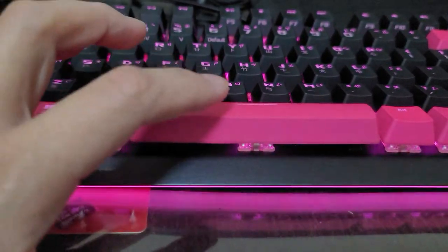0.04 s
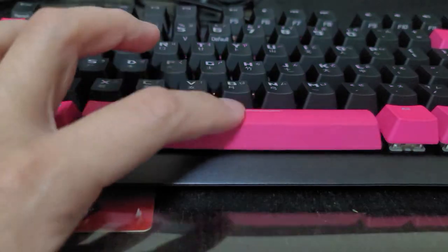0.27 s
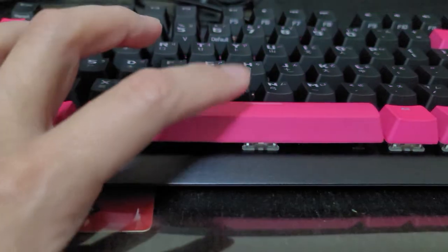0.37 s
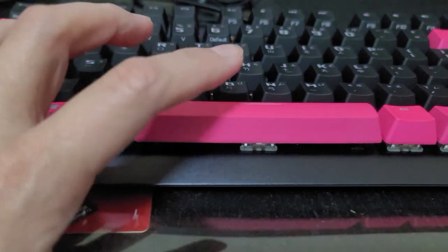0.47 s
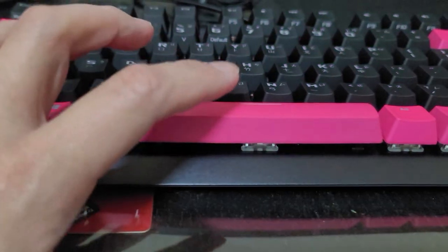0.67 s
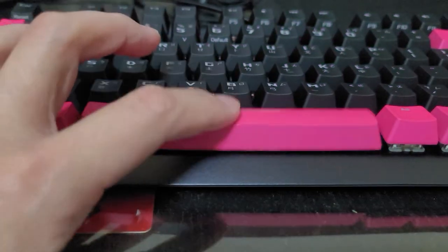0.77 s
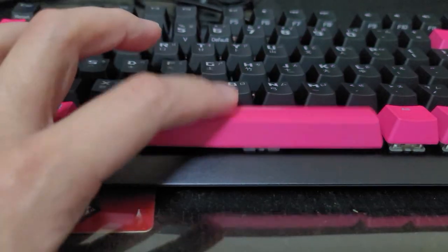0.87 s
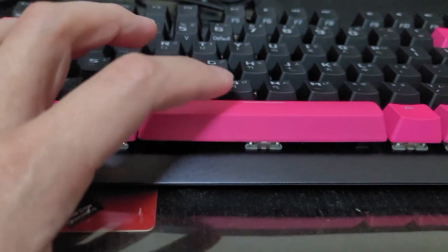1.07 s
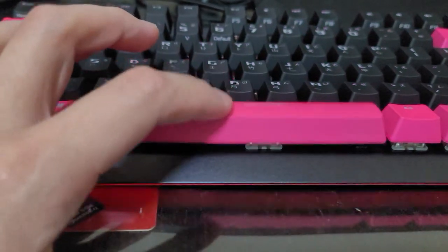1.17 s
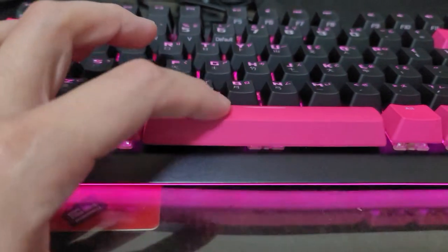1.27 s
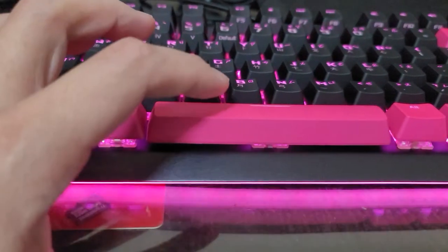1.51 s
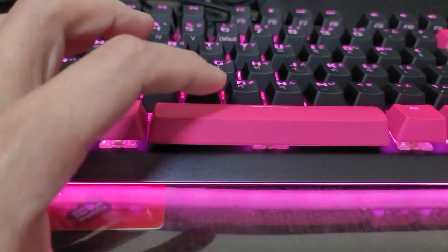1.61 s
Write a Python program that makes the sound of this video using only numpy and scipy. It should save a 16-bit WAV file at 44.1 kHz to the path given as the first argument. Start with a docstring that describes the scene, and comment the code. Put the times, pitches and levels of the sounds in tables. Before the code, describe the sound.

A mechanical keyboard's spacebar is tapped twice up close, followed by a softer click.

```python
"""A clicky mechanical keyboard on a desk in a small, quiet room, close to a pair of microphones.
Faint air noise and a fan's hum run throughout. A finger works the spacebar twice: the slider scrapes,
the switch snaps, the bar knocks as it bottoms out and thumps the desk; on release its wire ticks and the
bar clacks against its top stop, rattles and thumps again. Last, the switch scrapes and snaps once more,
with no knock, and the wire gives a faint tick. The room rings briefly after each contact."""
import sys
import numpy as np
from scipy import signal
from scipy.fft import rfft, irfft
from scipy.io import wavfile
from scipy.ndimage import uniform_filter1d

SR = 44100
rng = np.random.default_rng(int(sys.argv[2]) if len(sys.argv) > 2 else 0)


def output_pcm(signal):
    """Save a mono or channel-first signal as 16-bit PCM at the path in sys.argv[1].

    Samples are clipped to [-1, 1] before scaling.
    """
    pcm = np.clip(np.atleast_2d(signal).T, -1, 1) * 32767
    wavfile.write(sys.argv[1], SR, np.round(pcm).astype(np.int16))


N = 72765

# spectrum of the room's steady air noise: f/Hz, relative level/dB
AIR_SPECTRUM = [(20, -37), (35, -19), (58, -6), (100, -14.5), (140, -12), (175, -13), (240, -7.5),
                (290, -15.5), (390, -11.5), (550, -17), (900, -22.5), (1350, -21), (2400, -27.5),
                (4500, -42.5), (7000, -49), (9000, -61), (16000, -65.5)]
# how alike that noise is at the two microphones: f/Hz, correlation
AIR_CORRELATION = [(100, 0.91), (350, 0.92), (800, 0.24), (2000, 0.1), (8000, 0.088)]
# decay of the room: f/Hz, t60/s
ROOM_DECAY = [(200, 0.64), (1000, 0.17), (3000, 0.2352), (7000, 0.12), (15000, 0.27)]
# colour of its reflections: f/Hz, relative level/dB
ROOM_SPECTRUM = [(200, 10.5), (800, -5), (1800, -2), (3300, -1.5), (6000, 1), (10000, -1), (15000, -15)]

# the slider rubs the leaf spring: t/s, level/dB
SLIDER_SCRAPES = [(0.2048, -15.5), (0.7374, -14.5), (1.1688, -16.5)]
# the switch snaps: t/s, level/dB, tilt/(dB per octave), left minus right/dB, bright mode f/Hz
SWITCH_SNAPS = [(0.2207, -6.5, -0.5, 2.5, 10710), (0.7545, -5.5, -2, 2.5, 10800),
                (1.1845, -5, 1.2, -1.5, 12520)]
# the bar bottoms out: t/s, level/dB, tilt/(dB per octave), thump level/dB
BAR_KNOCKS = [(0.246, -4, 2, -14.5), (0.768, 0.5, 2.5, -8.5)]
# the stabiliser wire ticks: t/s, level/dB, tilt/(dB per octave)
WIRE_TICKS = [(0.292, -20.5, -3.5), (0.3035, -13.5, -2.5), (0.8343, -13.5, -2.5), (0.854, -17.5, -2.5),
              (1.277, -27.5, -0.5)]
# the bar hits its top stop: t/s, level/dB, tilt/(dB per octave), thump level/dB
BAR_CLACKS = [(0.3164, 3, -1, 0.5), (0.8783, 1, -0.5, -0.5)]

# colour of each kind of contact: f/Hz, relative level/dB
SCRAPE_SPECTRUM = [(500, -39), (1400, -6.5), (2400, -3), (3500, -2), (6000, -11.5), (10000, -12),
                   (15000, -22)]
SNAP_SPECTRUM = [(410, -63.5), (700, -36.5), (1660, -9.5), (2050, -16), (2460, -7), (3280, 0), (4100, -5.5),
                 (5470, -5.5), (6070, -10), (10500, -11), (11500, -19.5), (12800, -6.5), (16000, -29.5)]
KNOCK_SPECTRUM = [(120, -50), (200, -34), (806, -0.5), (1060, -9.5), (2050, -1), (2960, -5.5), (3250, -1.5),
                  (4770, -19.5), (5630, -23), (6400, -19.5), (9060, -26.5), (16000, -42)]
TICK_SPECTRUM = [(800, -37), (1900, -8), (2900, -8), (3550, 5), (4100, -16), (6000, -12), (15000, -25)]
CLACK_SPECTRUM = [(120, -42.5), (200, -19), (683, -7.5), (1400, -9.5), (1680, -2.5), (2290, -6),
                  (2560, -10.5), (3250, -2), (4430, -17), (5040, -9.5), (6050, -11.5), (13600, -14.5),
                  (16000, -14.5)]
# balance of the contacts between the microphones: f/Hz, left minus right/dB
SWITCH_BALANCE = [(1500, -5), (2400, -5), (3300, 6), (4800, -6), (7500, -4), (10500, 4), (14000, 13)]
KNOCK_BALANCE = [(800, 0), (2200, 0), (3300, -3.5), (5000, -6.5), (8000, -1.5), (14000, 7.5)]
CLACK_BALANCE = [(300, 3.5), (900, -2), (1600, -7.5), (2400, -8), (3300, 2), (5000, -1), (7500, -0.5),
                 (10500, -1.5), (14000, 7)]

# modes of the plastic bar and its plate: f/Hz, relative level/dB, t60/s
BAR_MODES = [(1198, 0.5, .11), (1474, -4, 0.2), (1741, -0.5, 0.084), (1990, -19.5, 0.16),
             (2348, -0.5, 0.059), (2704, -0.5, 0.068), (3270, -3, 0.089), (3246, -2.5, 0.18),
             (3520, -13, 0.043), (5590, -19.5, .08), (6700, -2, .15)]
# modes of the switch housing: f/Hz, relative level/dB, t60/s
HOUSING_MODES = [(1295, -18.5, 0.075), (2524, -8, 0.0284), (3322, -4.5, 0.023), (5490, -9, 0.022)]
# modes of the case on the desk: f/Hz, relative level/dB, t60/s, build-up/s
DESK_MODES = [(72, -6.5, .2, 0.018), (115.3, 1, 0.25, 0.032), (251.3, -4, 0.3, .004),
              (271.2, 1, 0.12, 0.0044), (377.7, -0.5, 0.18, 0.008), (445.8, -3.5, 0.18, .003)]

SCRAPE_RISE_S, SCRAPE_T60_S = 0.005, 0.018


def amp(db):
    """Decibels to gain."""
    return 10 ** (np.asarray(db) / 20)


def read(points, hz):
    """A table's value on a logarithmic frequency axis."""
    f, value = np.transpose(points)
    return np.interp(np.log(hz + 1), np.log(f + 1), value)


def unit(x):
    """Scales to an energy of one per channel, on average."""
    return x / np.sqrt(np.mean(np.sum(x ** 2, -1)) + 1e-20)


def add(mix, s, sound):
    """Lays a sound into the mix at s seconds."""
    part = mix[:, max(round(s * SR), 0):][:, :sound.shape[-1]]
    part += sound[..., :part.shape[1]]


def split_db(balance_db):
    """Left and right levels in dB for a difference between the microphones."""
    return np.array([[.5], [-.5]]) * balance_db


def correlate(noises, correlation):
    """Blends two independent noises into a partly alike left and right."""
    a, b = noises
    return np.array([a, correlation * a + np.sqrt(1 - correlation ** 2) * b])


def colour(x, db, size=4096):
    """Causal filter with a gain curve in dB, one per channel."""
    cepstrum = irfft(np.log(amp(np.maximum(db, -100))))
    cepstrum[..., 1:size // 2] *= 2
    cepstrum[..., size // 2 + 1:] = 0
    return signal.fftconvolve(x, irfft(np.exp(rfft(cepstrum))), axes=1)


def mode(t, hz, t60_s, phase=0):
    """One dying resonance; the phase is in cycles."""
    return amp(-60 * t / t60_s) * np.sin(2 * np.pi * (hz * t + phase))


def drift():
    """Slow random wavering, 1 to 10 Hz, with an rms of one."""
    t = np.arange(N) / SR
    waves = sum(np.sin(2 * np.pi * (f * t + rng.random())) for f in np.geomspace(1, 10, 24))
    return np.sqrt(N) * unit(waves)


def air(rms_db=-53):
    """Room tone: a rumble nearly the same at both microphones, and a diffuse hiss."""
    hz = np.fft.rfftfreq(N, 1 / SR)
    noise = correlate(rfft(rng.standard_normal((2, N))), read(AIR_CORRELATION, hz))
    tone = irfft(noise * amp(read(AIR_SPECTRUM, hz)), N)
    return amp(rms_db) * np.sqrt(N) * unit(tone)


def fan(hum_hz=233.1, wander_hz=3.75, rms_db=-58.5):
    """A fan hums faintly in the centre, wavering in level and pitch."""
    level = 1 + 0.25 * drift()
    hz = hum_hz + wander_hz * drift()
    hum = level * np.sin(2 * np.pi * np.cumsum(hz) / SR)
    return amp(rms_db) * np.sqrt(N) * unit(hum)


def contact(spectrum, balance, rise_s, t60_s, tilt_db=0, ring_db=-8.5, size=4096):
    """One contact: a dense, quickly dying cluster of plastic resonances and the bar's longer ring."""
    t, hz = np.arange(size) / SR, np.fft.rfftfreq(size, 1 / SR)
    envelope = np.minimum(t / rise_s, 1) * amp(-60 * np.maximum(t - rise_s, 0) / t60_s) + 1e-9
    burst = correlate(rng.standard_normal((2, size)), 0.53) * envelope
    for _ in range(5):  # keeps the cluster's spectrum even and its decay smooth
        bins = rfft(burst)
        burst = irfft(bins / np.sqrt(uniform_filter1d(abs(bins) ** 2, size=25) + 1e-12))
        burst *= envelope / np.sqrt(abs(uniform_filter1d(burst ** 2, size=64)) + 1e-14)
    ring_t = np.arange(2 * size) / SR
    ring = np.zeros((2, 2 * size))
    for f, db, t60 in BAR_MODES:
        phases = rng.random() + rng.random((2, 1)) / 2  # one for each microphone
        ring += amp(db) * unit(mode(ring_t, f, t60, phases))
    gain_db = read(spectrum, hz) + tilt_db * np.log2((hz + 100) / 3000)
    gain_db = gain_db + split_db(read(balance, hz))
    out = amp(ring_db) * unit(colour(ring, gain_db))
    add(out, 0, unit(colour(burst, gain_db)))
    return out


def scrapes(mix):
    """The slider rubs over the leaf spring just before each snap."""
    for s, db in SLIDER_SCRAPES:
        add(mix, s, amp(db) * contact(SCRAPE_SPECTRUM, SWITCH_BALANCE, SCRAPE_RISE_S, SCRAPE_T60_S))


def room(x, delay_s=0.0063, gain_db=-8):
    """Dense reflections from nearby walls; the bass lingers longest."""
    hz, t, noise = signal.stft(rng.standard_normal((2, SR // 2)), SR, nperseg=256)
    decay = amp(-60 * t / read(ROOM_DECAY, hz)[:, None])
    tail = signal.istft(noise * decay, SR)[1]
    tail = colour(unit(tail), read(ROOM_SPECTRUM, np.fft.rfftfreq(4096, 1 / SR))[None])
    out = np.zeros((2, N))
    add(out, delay_s, amp(gain_db) * signal.fftconvolve(x, tail, axes=1))
    return out


def snaps(mix, rise_s=0.00099, t60_s=0.016, bright_db=-8.5, bright_t60_s=0.0088):
    """The switch snaps and its housing rings, with one bright mode that differs from snap to snap."""
    t = np.arange(SR // 10) / SR
    attack = np.minimum(t / rise_s, 1)
    for s, db, tilt, pan_db, bright_hz in SWITCH_SNAPS:
        gain = amp(db + split_db(pan_db))
        add(mix, s, gain * contact(SNAP_SPECTRUM, SWITCH_BALANCE, rise_s, t60_s, tilt))
        for f, mode_db, t60 in HOUSING_MODES + [(bright_hz, bright_db, bright_t60_s)]:
            ring = unit(attack * mode(t, f, t60, rng.random()))
            add(mix, s, gain * amp(mode_db + split_db(read(SWITCH_BALANCE, f))) * ring)


def knocks(mix, rise_s=0.0012, t60_s=0.018):
    """The bar bottoms out, then settles with one small bounce."""
    for s, db, tilt, _ in BAR_KNOCKS:
        knock = contact(KNOCK_SPECTRUM, KNOCK_BALANCE, rise_s, t60_s, tilt)
        bounce = contact(KNOCK_SPECTRUM, KNOCK_BALANCE, rise_s, t60_s, tilt)
        add(mix, s, amp(db) * knock)
        add(mix, s + 0.014, amp(db - 17) * bounce)


def desk_thumps(mix, gain_db=-12):
    """Each knock and clack sets off the low modes of the case and the desk under it."""
    t = np.arange(SR // 2) / SR
    thump = sum(amp(db) * unit(np.minimum(t / rise, 1) ** 2 * mode(t, f, t60))
                for f, db, t60, rise in DESK_MODES)
    for s, _, _, thump_db in BAR_KNOCKS + BAR_CLACKS:
        add(mix, s, amp(thump_db + gain_db) * thump)


def finger_thuds(mix, hz=79.4, rise_s=0.008, t60_s=0.08, gain_db=-12):
    """The weight of the finger lands on the keyboard at each knock: a couple of low cycles."""
    t = np.arange(SR // 5) / SR
    thud = unit(np.minimum(t / rise_s, 1) * mode(t, hz, t60_s))
    for s, _, _, thump_db in BAR_KNOCKS:
        add(mix, s, amp(thump_db + gain_db) * thud)


def ticks(mix, rise_s=0.0018, t60_s=0.036):
    """The stabiliser wire ticks in its clips."""
    for s, db, tilt in WIRE_TICKS:
        add(mix, s, amp(db) * contact(TICK_SPECTRUM, SWITCH_BALANCE, rise_s, t60_s, tilt))


def clacks(mix, rise_s=0.0009):
    """On release the stem slides, then the bar springs against its top stop and rattles, a bit duller."""
    for s, db, tilt, _ in BAR_CLACKS:
        slide = contact(SCRAPE_SPECTRUM, CLACK_BALANCE, SCRAPE_RISE_S, SCRAPE_T60_S)
        clack = contact(CLACK_SPECTRUM, CLACK_BALANCE, rise_s, t60_s=0.034, tilt_db=tilt)
        rattle = contact(CLACK_SPECTRUM, KNOCK_BALANCE, rise_s, t60_s=0.074, tilt_db=tilt - 1.47)
        add(mix, s - 0.0025, amp(db - 4) * slide)
        add(mix, s, amp(db) * clack)
        add(mix, s + 0.0068, amp(db - 7.5) * rattle)


def microphones(x, right_lag_s=0.00008, mono_below_hz=600):
    """A close pair: the right microphone is about 3 cm farther off, and both hear the same bass."""
    hz = np.fft.rfftfreq(N, 1 / SR)
    bins = rfft(x)
    bins[1] *= np.exp(-2j * np.pi * hz * right_lag_s)
    mid = bins.mean(0)
    side = (bins - mid) * hz / np.hypot(hz, mono_below_hz)
    return irfft(mid + side, N)


def scene():
    """The keyboard up close, the room behind it, the low thumps in the centre."""
    keys = np.zeros((2, N))
    for source in (scrapes, snaps, knocks, clacks, ticks):
        source(keys)
    out = microphones(keys + room(keys)) + air() + fan()
    desk_thumps(out)
    finger_thuds(out)
    return out


def record(dry, edge_hz=16000):
    """The recorder's band limit."""
    lowpass = signal.firwin(255, edge_hz, window=("kaiser", 9), fs=SR)
    return signal.oaconvolve(dry, lowpass[None], "same")


dry = scene()
out = record(dry)
output_pcm(out)
```